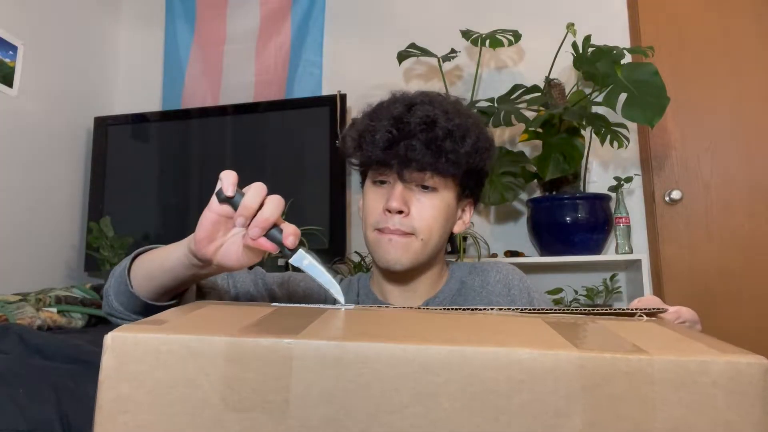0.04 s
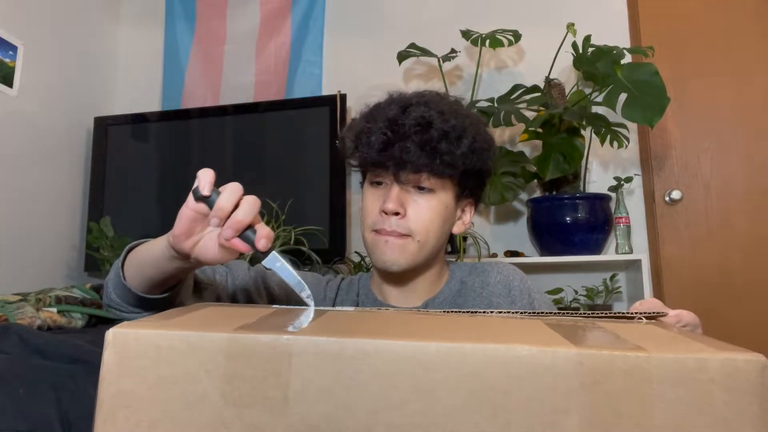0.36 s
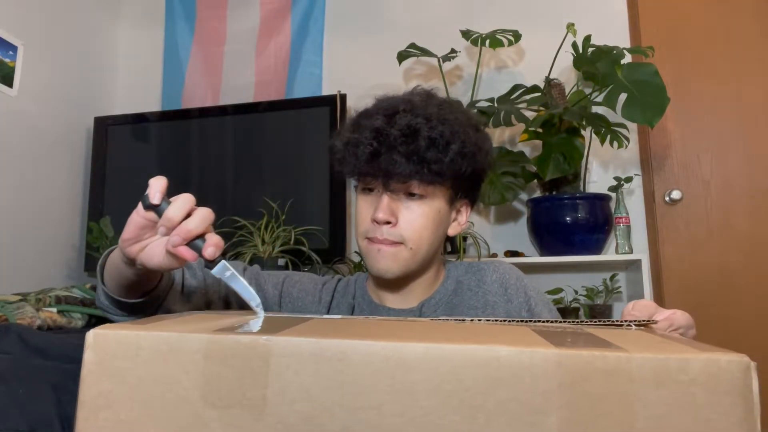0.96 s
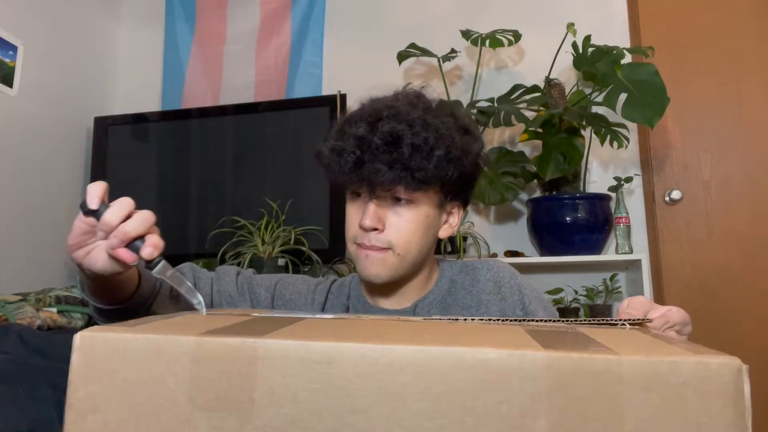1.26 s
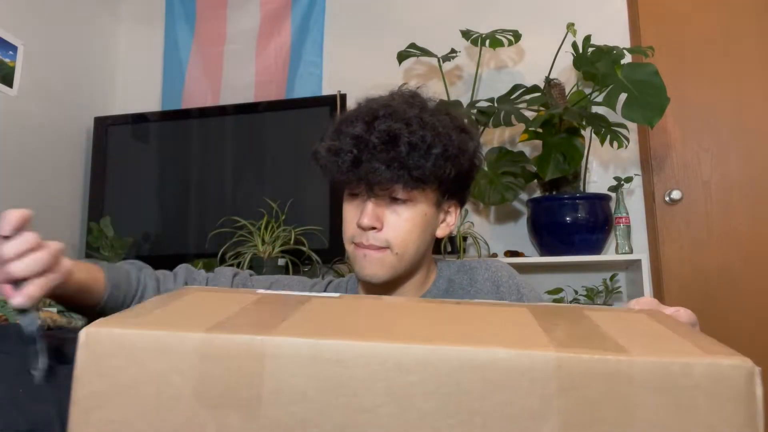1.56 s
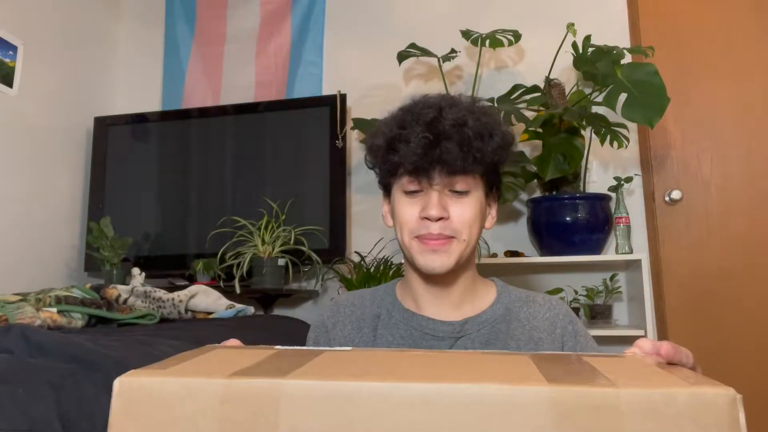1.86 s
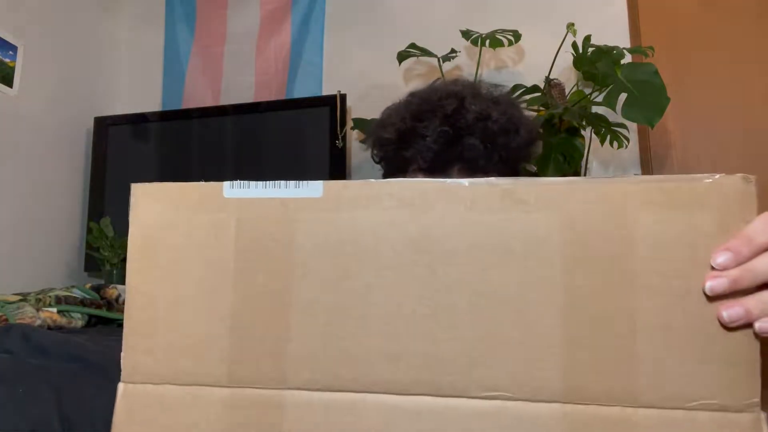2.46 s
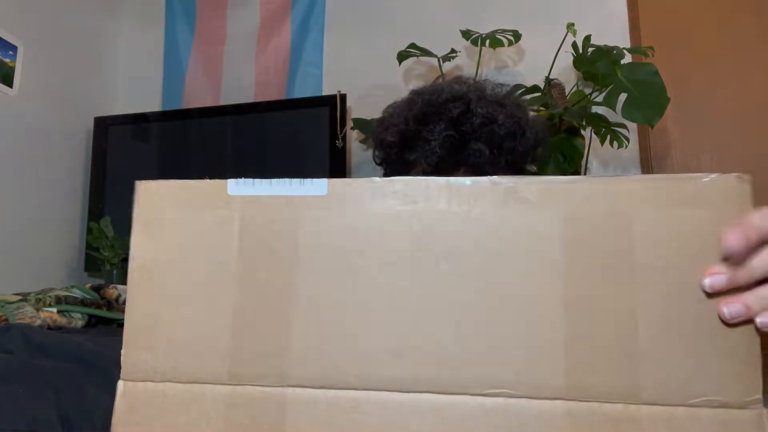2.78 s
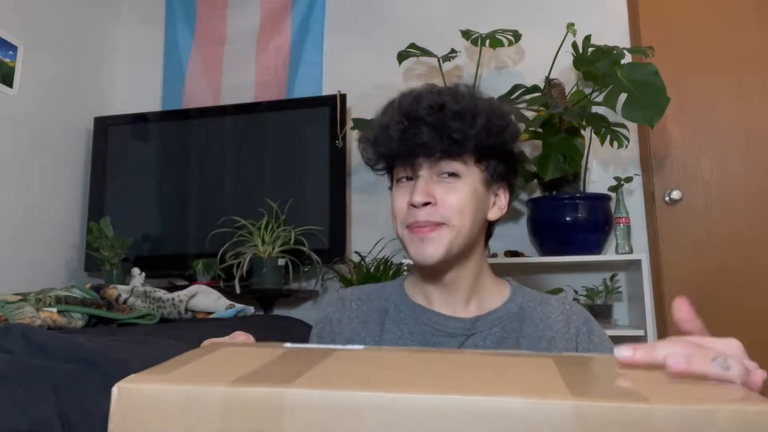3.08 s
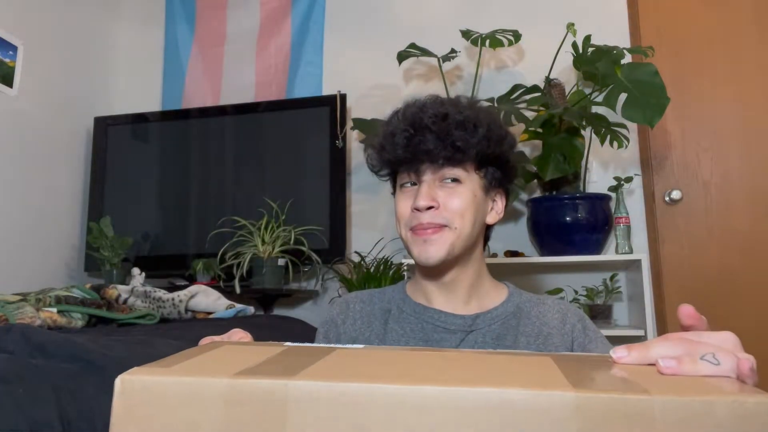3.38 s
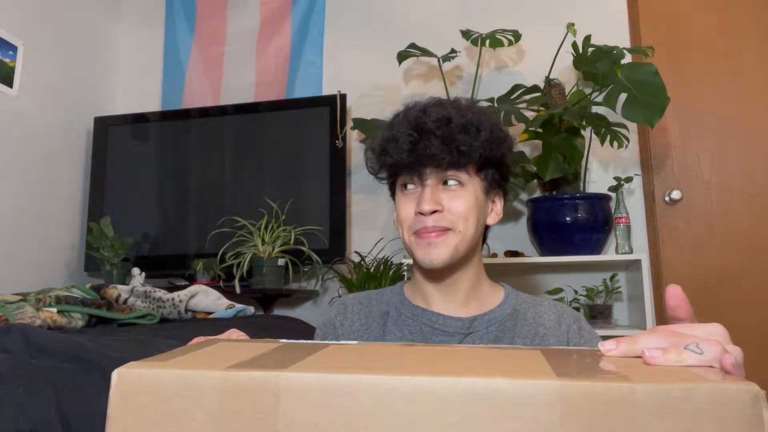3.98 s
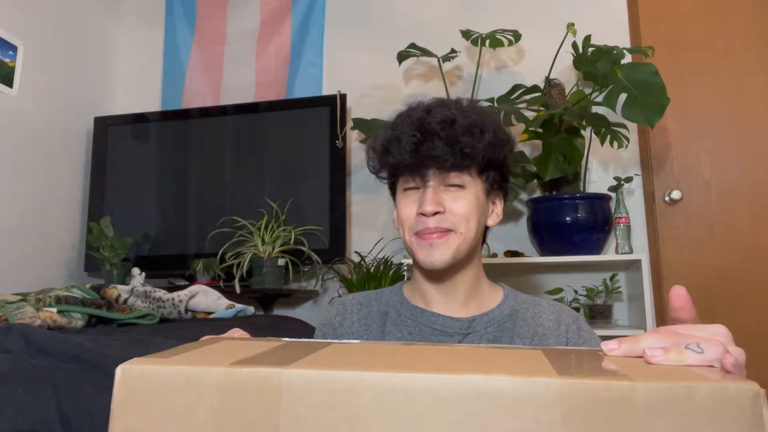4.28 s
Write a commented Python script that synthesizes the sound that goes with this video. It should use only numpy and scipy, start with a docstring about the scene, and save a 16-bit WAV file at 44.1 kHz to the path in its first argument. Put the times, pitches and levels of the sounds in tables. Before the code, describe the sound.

A knife slits packing tape on a cardboard box with rasps, snaps and hollow knocks, then the box is shoved along over a low hum.

```python
"""A knife slits the packing tape on a big cardboard box, close by, in a few rasping pulls.
The blade sticks and slips, the tight tape snaps, and the thin steel rings now and then.
Bumps make the hollow box knock, and its top panel springs back with a thump.
Then the box is shoved along, rubbing on hands and table, with one short squeak.
An appliance hums in the small room the whole time."""
import sys
import numpy as np
from scipy import signal
from scipy.fft import rfft, irfft, next_fast_len
from scipy.io import wavfile
from scipy.ndimage import uniform_filter1d, map_coordinates

SR = 44100
rng = np.random.default_rng(int(sys.argv[2]) if len(sys.argv) > 2 else 0)


def digitize_waveform(pressure):
    """Quantize a signal to 16-bit integers and store it at the path in sys.argv[1].

    Rows of a 2-D input are taken as channels; values are limited to [-1, 1].
    """
    field = np.atleast_2d(pressure).T
    bounded = np.clip(field, -1, 1)
    quanta = np.round(bounded * 32767).astype(np.int16)
    wavfile.write(sys.argv[1], SR, quanta)


N = 195590

# Levels are relative. A fade is the time a sound takes to fall by 60 dB.
# pulls of the knife: t/s, rise/s, hold/s, release/s, tape rasp/dB, board scrape/dB, panel flex/dB
PULLS = [(0.005, 0.09, 0.038, 0.061, -65, -43.5, -47.5), (0.205, 0.12, 0.068, 0.067, -58, -48.5, -56),
         (0.44, 0.044, 0.0061, 0.13, -62.5, -53.5, -50), (0.775, 0.071, 0.038, 0.1, -53, -42.5, -39),
         (0.875, 0.025, 0.021, 0.11, -55.5, -44.5, -50.5), (1.0, 0.068, 0.089, 0.55, -60, -51, -45),
         (1.118, .03, 0.044, .12, -46, -40, -33.5), (1.185, .05, 0.039, 0.18, -47.5, -42, -37.5),
         (1.385, .05, .025, 0.13, -52.5, -39, -43.5), (1.432, 0.085, 0.014, 0.069, -41, -39.5, -40),
         (1.5, .03, 0.028, 0.21, -61, -53.5, -46.5)]
# tone of tearing tape: f/Hz, level/dB
TAPE_TONE = [(500, -34.5), (1500, 6), (2000, 3.5), (2600, 1.5), (3500, 1), (5000, 1.5), (5900, -0.5),
             (6600, 2), (7500, 0), (8500, 2), (11000, 0.5), (13000, 0), (15500, -1.5)]
# tone of scraped cardboard: f/Hz, level/dB
SCRAPE_TONE = [(160, -31), (280, -2.5), (354, 1), (564, -11.5), (652, 2.5), (729, -7), (921, -7),
               (1120, -3.5), (1440, -24), (1640, -18.5), (1780, -27.5), (2420, -19.5), (4000, -47),
               (5200, -43), (8800, -120)]
# tone of a bending panel: f/Hz, level/dB
FLEX_TONE = [(35, -28.5), (60, -1.5), (80, 5), (97, -0.5), (120, 0.5), (145, -3.5), (185, -3), (260, -17),
             (340, -12.5), (450, -25), (900, -75)]
# pitches where cardboard rings: f/Hz, half width/Hz, level/dB (not used)
BOARD_RINGS = [(651.5, 19, 0), (986, 260, -3), (2635, 70, -15)]
# notes of the motor: f/Hz, level/dB
MOTOR_NOTES = [(53.4, -36.5), (80, -70), (106.8, -66.5), (172, -69), (226, -62), (355, -66)]
# tone of the room's air: f/Hz, level/dB
AIR_TONE = [(53, -36), (90, -4.5), (117, 0), (142, -11), (172, -2.5), (196, -15.5), (224, -5.5),
            (260, -11.5), (360, -11.5), (467, -23), (521, -19), (769, -32), (839, -29), (1830, -47),
            (16000, -57)]
# tone of the low rumble: f/Hz, level/dB
RUMBLE_TONE = [(15, -28), (40, 0), (65, 2.5), (110, -16.5), (250, -49), (600, -81.5)]
# bumps on the box: t/s, level/dB, extra thud/dB
BUMPS = [(0.2447, -22.5, 0.5), (0.438, -40.5, -2), (0.763, -34, -26), (1.093, -31, -0.5), (1.117, -25, -4),
         (1.429, -20.5, -1.5), (1.452, -23.5, -17), (1.842, -31.5, -1), (1.944, -37, -5.5),
         (2.007, -56, -1), (2.039, -35, 3.5), (2.173, -44.5, 4.5), (2.8015, -30, 2)]
# tone of a papery knock: f/Hz, level/dB
KNOCK_TONE = [(200, -6), (420, -9), (650, -2.5), (1000, -5), (1500, -9), (2400, -13), (3500, -18.5),
              (8000, -29.5), (16000, -48.5)]
# tone of the thud under it: f/Hz, level/dB
THUD_TONE = [(50, -30), (100, -0.5), (200, -6), (340, 0.5), (450, -4), (800, -34), (2000, -67.5)]
# tape and card snapping: t/s, level/dB, strongest f/Hz
SNAP_TIMES = [(0.2448, -38, 2120), (0.5234, -37.5, 14200), (0.647, -64.5, 9070), (0.7595, -34.5, 2620),
              (0.8284, -39, 14600), (0.843, -36.5, 8150), (0.858, -47.5, 2240), (0.8945, -41, 2140),
              (0.9575, -40, 14340), (0.9876, -46.5, 2040), (0.9942, -40, 7130), (1.0026, -30.5, 7030),
              (1.028, -35, 15500), (1.0934, -33.5, 2340), (1.102, -30.5, 3400), (1.1107, -30, 9050),
              (1.363, -30.5, 7010), (1.383, -31, 7000), (1.4297, -17, 13100), (1.4337, -26, 13300),
              (1.4514, -24.5, 2700), (1.664, -44, 8100), (1.7211, -37.5, 8700), (1.743, -53.5, 8000),
              (1.84, -45.5, 2550), (2.0065, -36.5, 2950), (2.0392, -41.5, 3580), (2.172, -40, 3920),
              (2.7342, -57, 7570), (2.755, -45, 2780), (2.9707, -43.5, 2370), (3.3084, -57.5, 2830),
              (3.809, -61.5, 13000)]
# tone of a snap: multiple of its strongest pitch, level/dB
SNAP_TONE = [(1 / 9, -21), (1 / 2, -6), (1, 1), (1.7, -3)]
# the top panel springing back: t/s, panel ring/dB, hollow boom/dB
SPRING_BACKS = [(0.776, -38, -37), (0.915, -62, -30.5), (1.017, -51, -30.5), (1.14, -35.5, -29),
                (1.178, -58, -24.5), (1.455, -19.5, -45), (2.123, -40.5, -47), (2.28, -64, -40),
                (2.837, -59, -35.5), (2.923, -35.5, -53)]
# notes of the top panel: f/Hz, level/dB, fade/s
PANEL_NOTES = [(166, 6, 0.033), (203.7, 4, 0.056), (301, -1.5, 0.077), (314, -25.5, 0.082)]
# the blade flicking free: t/s, level/dB
FLICKS = [(.8435, -52), (1.437, -39), (1.449, -39), (1.514, -51), (1.7235, -47)]
# notes of the steel blade: f/Hz, level/dB, fade/s
STEEL_NOTES = [(7400, -6, .035), (8680, 0, .018), (8960, -2, .022), (14600, -12, .015)]
# shoves of the box: t/s, rise/s, hold/s, release/s, hiss/dB, board rub/dB, panel flex/dB
SHOVES = [(1.845, 0.026, 0.01, 0.11, -62, -53.5, -51), (1.95, 0.037, 0.0096, 0.12, -61.5, -57, -48.5),
          (2.01, 0.022, 0.042, 0.2, -65.5, -56.5, -54), (2.178, 0.011, 0.0076, 0.09, -61.5, -55.5, -56),
          (2.26, 0.083, 0.027, 0.098, -64, -57, -53), (2.825, 0.11, 0.051, .14, -57, -50.5, -40.5),
          (2.96, 0.13, 0.096, 0.14, -51, -45.5, -48)]
# tone of the sliding surface: f/Hz, level/dB
HISS_TONE = [(600, -19), (850, 6.5), (1400, 10), (1900, 5.5), (2450, 5.5), (3400, 0.5), (4400, 2.5),
             (5800, -1), (7500, -3), (9300, 0), (11500, -11.5), (13500, 2), (15500, -4)]
# tone of rubbed cardboard: f/Hz, level/dB
RUB_TONE = [(160, -10.5), (280, 4), (480, -4.5), (631, -8.5), (790, -5.5), (900, -4), (1360, -7.5),
            (1800, -16.5), (2100, -19.5), (3130, -25), (4000, -29), (5200, -53), (8800, -120)]
# how long the room echoes: f/Hz, fade/s
ROOM_FADES = [(100, 0.16), (400, 0.57), (2000, 0.23), (8000, 0.26), (15000, 0.17)]
# how alike left and right are: f/Hz, likeness (0 unrelated, 1 the same)
LIKENESS = [(60, 0.61), (150, 0.67), (300, 0.62), (650, 0.083), (1100, 0.56), (2000, 0.16), (4500, 0.02),
            (5900, 0), (6800, 0.91), (16000, 0.93)]
# how the box's sound leans to one side: f/Hz, left minus right level/dB
LEAN = [(100, 0.5), (280, -5.5), (550, -9), (1000, 0.5), (2000, -1.9), (6000, -0.5)]
# how far the microphone's two openings are out of step: f/Hz, phase/half turns
MIC_PHASE = [(8100, 0), (10100, 1), (11800, 1), (13900, 2)]


def amp(db):
    """Turn decibels into a gain to multiply by."""
    return 10 ** (np.asarray(db) / 20)


def unit(x):
    """Scale x to an average strength (rms) of 1."""
    return x / np.sqrt(np.mean(x ** 2) + 1e-20)


def struck(x, seconds):
    """Scale a hit to an average strength of 1 over its first seconds."""
    return x / np.sqrt(np.mean(x[:, :int(seconds * SR)] ** 2))


def along(points, hz):
    """Read between the rows of a table of pitches, on a log scale."""
    pitches, values = np.transpose(points)
    return np.interp(np.log(hz + 1), np.log(pitches + 1), values)


def add(track, start, sound):
    """Mix a sound into the track at start seconds."""
    part = track[:, round(start * SR):][:, :sound.shape[1]]
    part += sound[:, :part.shape[1]]


def wobble(rate):
    """A smooth curve through rate random points a second."""
    points = rng.standard_normal(int(N * rate / SR) + 4)
    return map_coordinates(points, [np.arange(N) * rate / SR])


def filtered(x, response):
    """Multiply each frequency in x by response(hz)."""
    size = next_fast_len(N + SR // 2)
    return irfft(rfft(x, size) * response(np.fft.rfftfreq(size, 1 / SR)), size)[..., :N]


def coloured(x, tone, ring_db=0, size=8192):
    """Give x a tone, lifting the pitches where cardboard rings by about ring_db."""
    hz = np.fft.rfftfreq(size, 1 / SR)
    peaks = sum(1 / (1 + ((hz - centre) / width) ** 2) for centre, width, _ in BOARD_RINGS)
    cepstrum = irfft(np.log(amp(along(tone, hz) + ring_db * peaks) + 1e-6))
    # fold it so that ringing comes after a hit, never before
    cepstrum[1:size // 2] *= 2
    cepstrum[size // 2 + 1:] = 0
    ringing = irfft(np.exp(rfft(cepstrum)))
    return signal.fftconvolve(x, ringing[None], axes=1)[:, :x.shape[1]]


def burst(fade, attack=0.0017):
    """A short puff of noise that dies away."""
    t = np.arange(SR // 4) / SR
    onset = 1 - np.exp(-(t / attack) ** 2)
    return rng.standard_normal((2, len(t))) * amp(-60 * t / fade) * onset


def slips(rate, scatter_db, smooth):
    """Surfaces stick and let go: rate tiny, uneven slips a second, over some smooth rubbing."""
    released = rng.random(N) < rate / SR
    sizes = amp(scatter_db * np.minimum(rng.exponential(size=N), 3))
    clicks = unit(released * sizes * rng.choice([-1, 1], (2, N)))
    return unit(clicks + smooth * rng.standard_normal((2, N)))


def wander(x, depth_db):
    """The point of contact travels, so some pitches swell while others fade."""
    spectrum = signal.stft(x, nperseg=512)[2]
    patches = rng.standard_normal(spectrum.shape[1:])
    for axis, size in [(0, 3), (0, 3), (1, 9), (1, 5)]:  # blur over pitch, then time
        patches = uniform_filter1d(patches, size, axis)
    return signal.istft(spectrum * amp(depth_db * unit(patches)), nperseg=512)[1][:, :N]


def stroke(start, rise, hold, release, sag_db_per_s=0, edge_db=20.5):
    """One hand movement: it gains edge_db over rise, eases off in hold, loses edge_db over release."""
    t = np.arange(N) / SR - start
    edges = np.maximum(-t, 0) / rise + np.maximum(t - hold, 0) / release
    return amp(-edge_db * edges - sag_db_per_s * np.clip(t, 0, hold))


def strokes(rows, sag_db_per_s):
    """One loudness curve for each dB column; overlapping movements add their power."""
    shapes = np.array([stroke(*row[:4], sag_db_per_s) for row in rows])
    gains = amp(np.array(rows)[:, 4:]).T
    return np.sqrt(gains ** 2 @ shapes ** 2)


def cutting():
    """The blade tears the tape in tiny slips, which also shake the cardboard and bend the panel."""
    rasp, scrape, flex = strokes(PULLS, sag_db_per_s=32)
    catch = unit(amp(1.3 * wobble(70) + 1.3 * wobble(300)))  # the edge catches and runs free
    tear = slips(rate=2200, scatter_db=3.8, smooth=.45) * catch
    shifting = wander(tear, depth_db=3)
    crackle = amp(-7) * slips(rate=110, scatter_db=2.5, smooth=0)  # rarer, larger tears
    tape = amp(2.2) * rasp * unit(coloured(unit(shifting) + crackle, TAPE_TONE))
    board = amp(0.87) * scrape * unit(coloured(shifting, SCRAPE_TONE))
    panel = amp(2) * flex * unit(coloured(tear, FLEX_TONE))
    return tape + board + panel


def hum(dip_at_s=1.692, dip_width_s=0.014, dip_db=-11):
    """A motor runs steadily over faint room air and rumble; the hum one hears drops for an instant."""
    t = np.arange(N) / SR
    motor = np.zeros(N)
    for hz, db in MOTOR_NOTES:
        drift = 0.00075 * hz * wobble(8.5)
        motor += np.sqrt(2) * amp(db) * np.sin(2 * np.pi * hz * t + drift)
    dip = amp(dip_db * np.exp(-((t - dip_at_s) / dip_width_s) ** 2))
    air = spread(unit(coloured(rng.standard_normal((2, N)), AIR_TONE)))
    rumble = spread(unit(coloured(rng.standard_normal((2, N)), RUMBLE_TONE)))
    return amp(-5.5) * motor * dip + amp(-54) * air + amp(-56) * rumble


def knocks():
    """Blade and hands bump the hollow box: a dry, papery knock over a low thud."""
    out = np.zeros((2, N))
    for start, db, thud_db in BUMPS:
        knock = struck(coloured(burst(fade=.022, attack=.0006), KNOCK_TONE, ring_db=10.5), 0.002)
        thud = struck(coloured(burst(fade=.071, attack=.0024), THUD_TONE), 0.026)
        add(out, start, amp(db - 9.5) * (knock + amp(thud_db - 3) * thud))
    return out


def snaps():
    """Tight tape gives way in single bright ticks, each trailing a faint crinkle."""
    out = np.zeros((2, N))
    for start, db, hz in SNAP_TIMES:
        tone = [(hz * multiple, level) for multiple, level in SNAP_TONE]
        crack = burst(fade=.008, attack=.001)
        crinkle = amp(-19) * burst(fade=.035)
        tick = struck(coloured(crack + crinkle, tone), 0.002)
        add(out, start, amp(db - 8.5) * tick)
    return out


def thumps(air_hz=84.2, air_fade_s=0.27):
    """Freed from pressure, the top panel rings briefly and pumps the air inside the box."""
    out, t = np.zeros((1, N)), np.arange(SR // 3) / SR
    onset = 1 - np.exp(-t / 0.0023)
    note = lambda hz, fade: amp(-60 * t / fade) * np.sin(2 * np.pi * hz * t) * onset
    ring = sum(amp(db) * note(hz, fade) for hz, db, fade in PANEL_NOTES)
    boom = note(air_hz, air_fade_s)
    for start, ring_db, boom_db in SPRING_BACKS:
        add(out, start, (amp(ring_db) * ring + amp(boom_db) * boom)[None])
    return out


def pings():
    """The thin steel blade flicks free and rings until the handle damps it."""
    out, t = np.zeros((1, N)), np.arange(SR // 8) / SR
    for start, db in FLICKS:
        ring = sum(amp(level + rng.normal(0, 1.7) - 60 * t / fade) * np.sin(2 * np.pi * hz * t)
                   for hz, level, fade in STEEL_NOTES)
        add(out, start, amp(db) * ring[None])
    return out


def sliding():
    """Cardboard rubs on hands and table, in finer slips than the cut."""
    hiss, rub, flex = strokes(SHOVES, sag_db_per_s=22)
    drag = slips(rate=3500, scatter_db=3, smooth=.7) * unit(amp(1.3 * wobble(60)))
    shifting = wander(drag, depth_db=2.3)
    surface = amp(5.5) * hiss * unit(coloured(shifting, HISS_TONE))
    board = amp(3.5) * rub * unit(coloured(shifting, RUB_TONE, ring_db=5.5))
    panel = amp(2.5) * flex * unit(coloured(drag, FLEX_TONE))
    return surface + board + panel


def squeak(start=3.002, groan_hz=310, squeal_hz=2200):
    """The slips briefly fall into step: a low groan and a thin, rough squeal sink together."""
    progress = np.clip((np.arange(N) / SR - start) / .085, 0, 1.5)
    sink = 1 - .095 * progress ** 2  # the pitch falls ever faster as the box slows

    def rough_note(pitch):
        hz = pitch * sink * (1 + .03 * wobble(600))
        return unit(np.sin(2 * np.pi * np.cumsum(hz) / SR) * amp(3.5 * wobble(160)))

    notes = amp(-47.5) * rough_note(groan_hz) + amp(-55.5) * rough_note(squeal_hz)
    return notes * stroke(start, rise=.025, hold=.08, release=.03)


def room(x):
    """The small room's short echo, different at each ear."""
    hz, t, noise = signal.stft(rng.standard_normal((2, SR // 2)), SR, nperseg=256)
    fading = amp(-60 * t / along(ROOM_FADES, hz)[:, None])
    tail = signal.istft(noise * fading, SR, nperseg=256)[1]
    tail = np.pad(tail, ((0, 0), (SR // 200, 0)))  # arrives 5 ms late
    return signal.fftconvolve(x, tail / np.linalg.norm(tail[0]), axes=1)[:, :N]


def spread(pair):
    """Blend two unrelated signals into left and right, more alike at some pitches than others."""
    angle = lambda hz: np.arccos(along(LIKENESS, hz)) / 2
    mid, side = filtered(pair, lambda hz: np.array([np.cos(angle(hz)), np.sin(angle(hz))]))
    return np.array([mid + side, mid - side])


def scene():
    """The box is close by, over the hum, and its lower middle pitches lean to the right."""
    noises = cutting() + snaps() + knocks() + sliding()
    panel = thumps()
    echo = amp(-12.5) * room(noises + panel)
    box = spread(noises + echo) + panel + pings() + squeak()
    return filtered(box, lambda hz: amp(np.outer([1, -1], along(LEAN, hz)) / 2)) + hum()


def record(dry):
    """The microphone's two openings fall out of step in the treble; the very top is cut off."""
    top_hz = 15950
    shifted = filtered(dry, lambda hz: np.exp(.5j * np.pi * np.outer([1, -1], along(MIC_PHASE, hz))))
    return filtered(shifted, lambda hz: hz < top_hz)


dry = scene()
out = record(dry)
digitize_waveform(out)
```